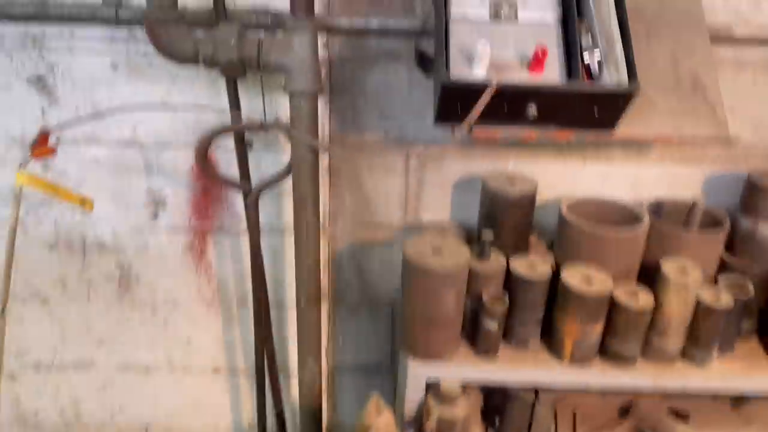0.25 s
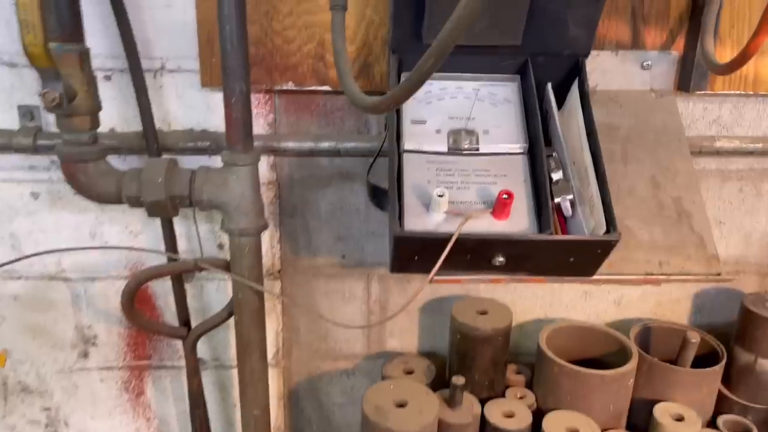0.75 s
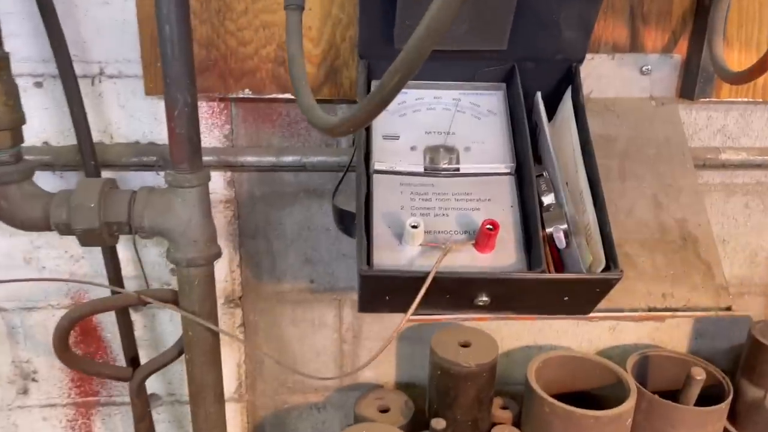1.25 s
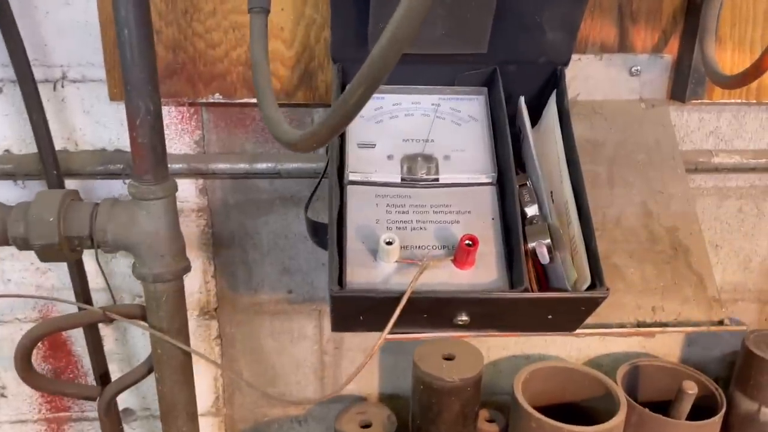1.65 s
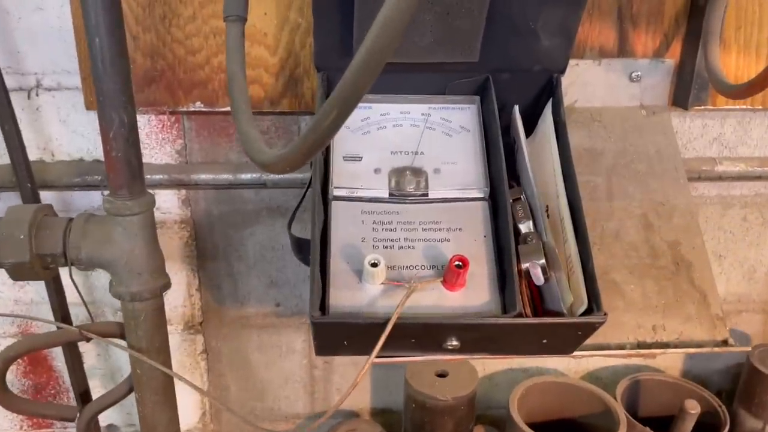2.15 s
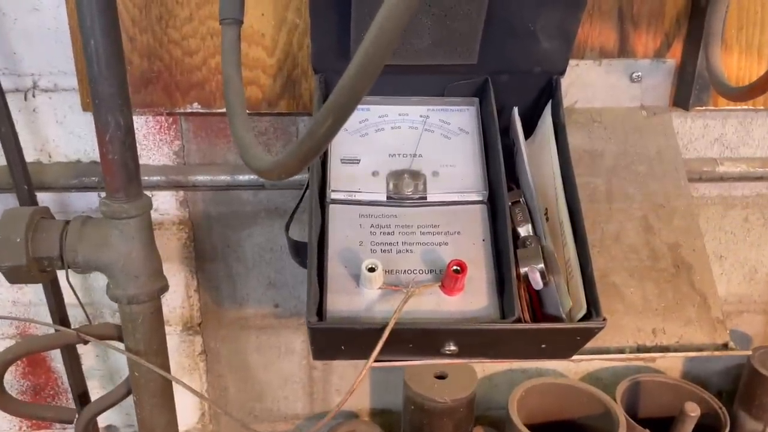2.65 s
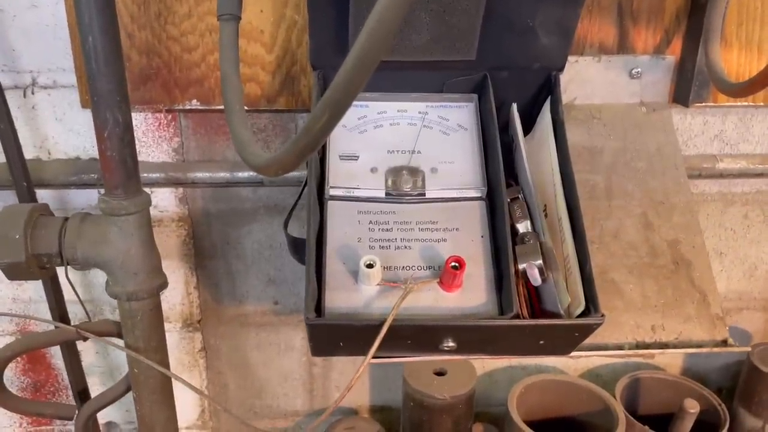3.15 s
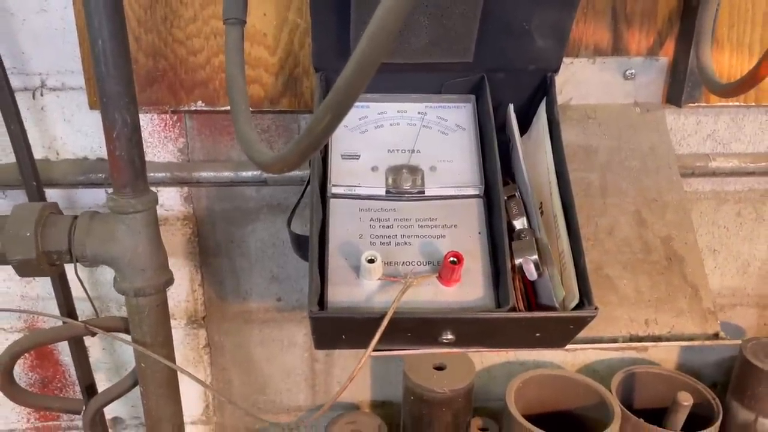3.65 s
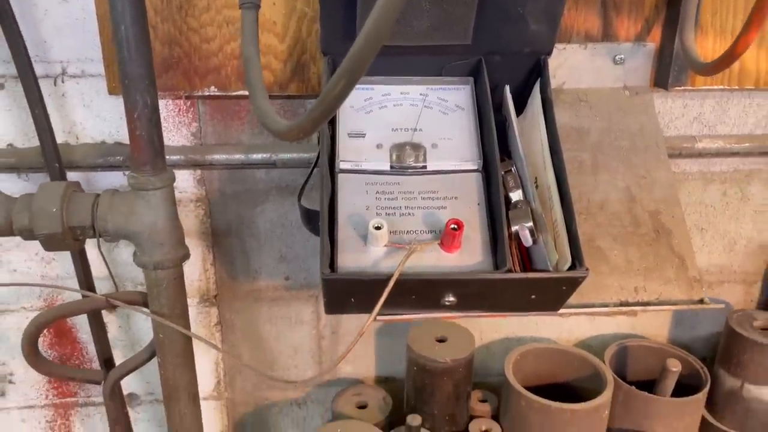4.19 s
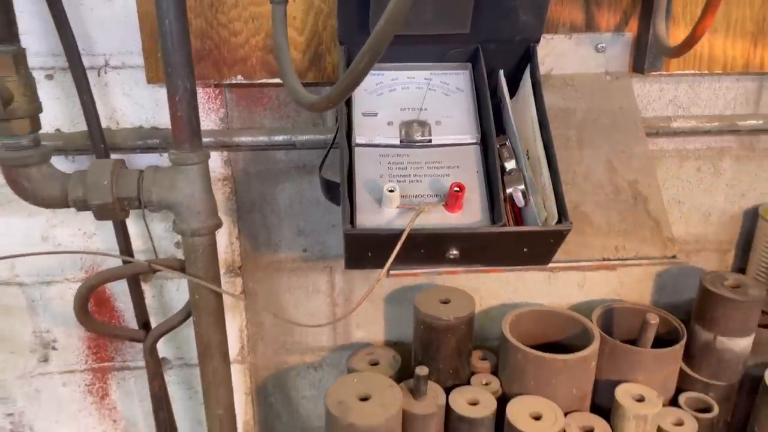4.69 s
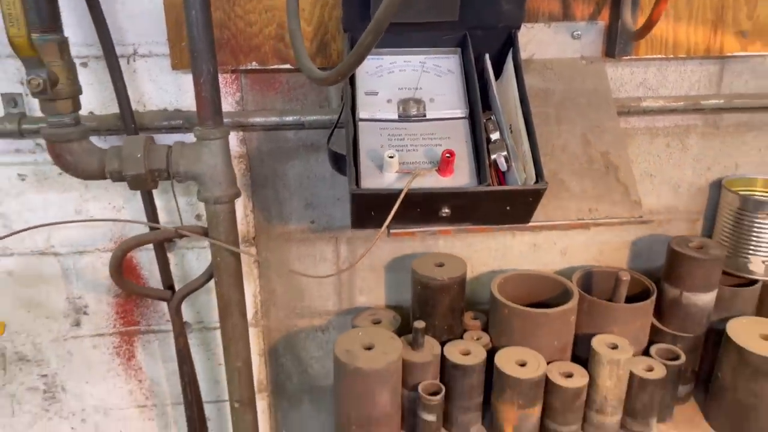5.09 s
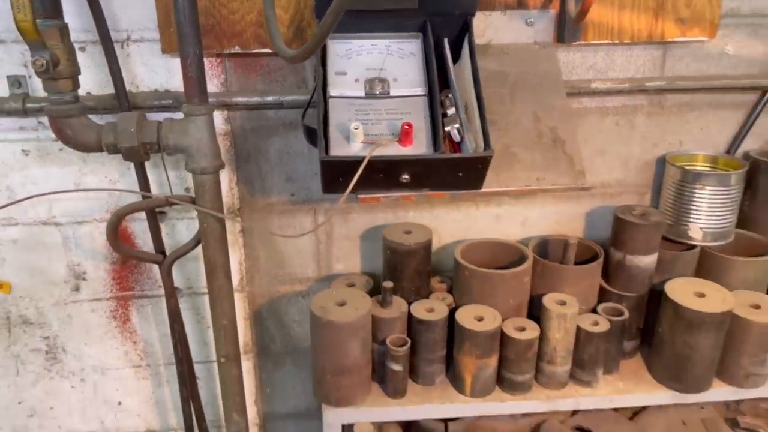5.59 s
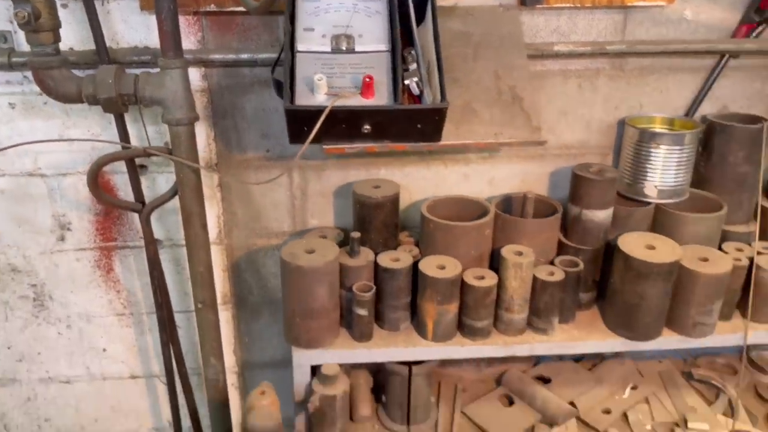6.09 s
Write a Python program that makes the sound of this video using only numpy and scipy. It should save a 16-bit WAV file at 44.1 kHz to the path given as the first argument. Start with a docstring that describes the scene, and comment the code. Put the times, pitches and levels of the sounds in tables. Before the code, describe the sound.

Steady burner roar fills a close workshop space, heard in stereo from a few steps away. Small gusts and soft thumps ripple through the flame, while the burner tube sings in short irregular swells. Gas and air hiss, and a blower motor hums with a faint whine toward the left. A quick cloth rub comes early; a tiny falling chirp appears around four seconds. The colour shifts subtly as the listener moves in and back.

```python
"""A gas-fired melting furnace runs steadily in a small workshop: shaped noise makes its rumble and roar.
The burner tube sings unsteadily (wavering sine plus narrow noise); gas and air hiss at the jet (noise).
The blower motor hums and whines (sines). The listener, a few steps away, leans in and back again,
which shifts echoes and low room peaks, with a brief rustle of clothing (noise strokes)."""
import sys
import numpy as np
from scipy import signal
from scipy.fft import rfft, irfft, next_fast_len
from scipy.io import wavfile

SR = 44100
rng = np.random.default_rng(int(sys.argv[2]) if len(sys.argv) > 2 else 0)


def master(y):
    """Save y as 16-bit WAV."""
    cut = np.clip(np.atleast_2d(y).T, -1, 1)
    pcm = np.round(cut * 32767)  # scale
    wavfile.write(sys.argv[1], SR, pcm.astype(np.int16))


N = 279229


def from_db(db):
    """Decibels to amplitude gain."""
    return 10 ** (np.asarray(db) / 20)


def rms_one(x):
    """Scale to rms 1."""
    return x / np.sqrt(np.mean(x ** 2) + 1e-20)


def in_time(rows):
    """Interpolate each column of a (time [s], ...) table at every sample."""
    time_s, *columns = np.transpose(rows)
    return [np.interp(np.arange(N) / SR, time_s, column) for column in columns]


def at_hz(points, hz):
    """Interpolate a (frequency [Hz], value) table on a log-frequency axis."""
    known_hz, values = np.transpose(points)
    return np.interp(np.log(hz + 1e-9), np.log(known_hz), values)


def pan(left_db):
    """Two channel gains for a left-minus-right level."""
    return from_db(np.array([[.5], [-.5]]) * left_db)


def drift(rate_hz):
    """Slow random signal of rms 1: white noise through two equal poles near rate_hz."""
    step = 40  # samples per slow sample
    pole = np.exp(-2 * np.pi * rate_hz * step / SR)
    white = rng.standard_normal(N // step + 2002)
    slow = signal.lfilter([1], [1, -2 * pole, pole * pole], white)[2000:]  # settled part
    return np.interp(np.arange(N) / step, np.arange(len(slow)), rms_one(slow))


def swell(start_s, hold_s, attack_s, release_s):
    """Envelope: exponential growth to 1, hold, exponential decay."""
    t = np.arange(N) / SR - start_s
    return np.exp(np.minimum(t, 0) / attack_s - np.maximum(t - hold_s, 0) / release_s)


def resonance(hz, centre_hz, width_hz):
    """Response of one damped mode, 1 at its top."""
    return 1j * hz * width_hz / (centre_hz ** 2 - hz ** 2 + 1j * hz * width_hz)


# chosen left-right correlation of the noise, opposed near 8 kHz: (frequency [Hz], correlation [-1..1])
EAR_CORRELATION = [(50, 0.99), (110, 0.97), (160, 0.91), (300, 0.92), (400, 0.78), (560, 0.89), (680, 0.46),
                   (900, 0.56), (1300, 0.59), (1950, 0.23), (3000, 0.53), (5800, 0.72), (6800, 0.29),
                   (8200, -0.85), (10800, 0.6)]
# stereo balance of the noise: (frequency [Hz], left minus right [dB])
EAR_BALANCE = [(60, 0.5), (200, 0.9), (330, -1.5), (600, -1.5), (800, 4), (1200, -2), (1500, 2), (2100, 2),
               (3200, 4), (5200, 3), (7500, 5.5), (12000, 1)]


def turbulence(gain_at):
    """Stereo noise of mid rms 1, shaped over frequency; ear correlation and balance vary by band."""
    size = next_fast_len(N, real=True)
    hz = np.fft.rfftfreq(size, 1 / SR)
    mid, side = rfft(rng.standard_normal((2, size)))
    correlation = np.clip(at_hz(EAR_CORRELATION, hz), -.995, .995)
    pair = np.sqrt(1 + correlation) * mid + np.sqrt(1 - correlation) * side * [[1], [-1]]
    shaped = pair * gain_at(hz) * pan(at_hz(EAR_BALANCE, hz))
    noise = irfft(shaped, size)[:, :N]
    return noise / np.std(noise.mean(axis=0))


def coloured(spectrum):
    """Turbulence with a tabulated spectrum."""
    return turbulence(lambda hz: from_db(at_hz(spectrum, hz)))


def narrow_noise(centre_hz, width_hz):
    """Narrow-band stereo noise of mid rms 1: sine and cosine carriers with random amplitudes."""
    phase = 2 * np.pi * np.cumsum(centre_hz * np.ones(N)) / SR
    mid, side = [drift(width_hz) * np.sin(phase) + drift(width_hz) * np.cos(phase) for part in range(2)]
    return mid + .5 * side * [[1], [-1]]


def tone(hz, waver_db, spread_rad):
    """Sine of rms 1 before its level wavers; the room shifts its phase in each ear."""
    phase = 2 * np.pi * np.cumsum(hz * np.ones(N)) / SR
    ears = np.array([np.sin(phase + spread_rad * drift(0.43)) for ear in range(2)])
    return np.sqrt(2) * ears * from_db(waver_db * drift(7.1))


def walls(x, away, echo_db=-20.0, travel_s=.0012, count=10):
    """Wall echoes comb the sound with fine ripples, which slide as the listener's head moves."""
    delays_s = rng.uniform(.008, .06, count)
    facings = rng.uniform(-1, 1, count)
    delays = [np.round((delay_s + facing * travel_s * away) * SR).astype(int)
              for delay_s, facing in zip(delays_s, facings)]
    echoes = sum(x[:, np.arange(N) - delay] for delay in delays)
    return x + from_db(echo_db) * echoes


# flame rumble and roar spectra: (frequency [Hz], relative level [dB])
RUMBLE_SPECTRUM = [(15, -38), (25, -27), (36, -8), (50, -2.5), (60, 0), (88, -2), (104, -1.5), (130, -5),
                   (160, -4), (190, -20), (400, -20), (2000, -82)]
ROAR_SPECTRUM = [(80, -26), (180, -7), (220, 0), (270, -1), (325, 2), (390, -2), (475, -1.5), (570, -2),
                 (690, -7), (910, -4.5), (1110, -10.5), (1500, -18.5), (2300, -21), (8000, -81)]
# flame rumble: (time [s], level [dB])
RUMBLE_LEVEL = [(0, -35.8), (1.0, -35), (2.0, -34.5), (2.7, -33), (3.4, -35.5), (4.1, -34), (5.3, -34),
                (6.33, -34)]
# chamber and flue resonances: (frequency [Hz], width [Hz], level before the roar's gain [dB])
CHAMBER_MODES = [(84.4, 4.6, -9), (321, 28, -12.5), (414.4, 7.3, -12.5), (1243, 93, -16), (1477, 22, -19.5)]


def flame(away, roar_db=-35, roar_loss_db=2, throb_db=0.2, flutter_db=0.59):
    """Turbulent burning: throbbing, puffing rumble and a fluttering, gusty roar that rings the chamber."""
    flutter = from_db(flutter_db * drift(15))
    throb = from_db(throb_db * drift(11))
    rumble_db, = in_time(RUMBLE_LEVEL)
    rumble = throb * from_db(rumble_db) * coloured(RUMBLE_SPECTRUM)
    burning = from_db(1.23) * walls(coloured(ROAR_SPECTRUM), away)
    chamber = sum(from_db(db) * turbulence(lambda hz: resonance(hz, centre_hz, width_hz))
                  for centre_hz, width_hz, db in CHAMBER_MODES)
    roar_gain = from_db(roar_db - roar_loss_db * away) * flutter
    roar = roar_gain * wall_dip(burning + chamber, away)
    return rumble + puffs() + gusts() + roar


# flame puffs: (time [s], frequency [Hz], envelope peak [dB])
PUFF_EVENTS = [(0.431, 62, -22), (0.651, 58, -21), (1.119, 99, -19), (1.46, 115, -22), (2.493, 112, -19),
               (2.811, 95, -19), (4.158, 68.4, -17), (4.211, 122, -21.5), (5.239, 70, -24)]


def puffs(rise_s=0.0051, fall_s=0.0073):
    """Pockets of gas burn all at once, each a dull thump in the chamber: a short sine burst."""
    t = np.arange(N) / SR
    return sum(from_db(db) * swell(start_s, 0, rise_s, fall_s) * np.sin(2 * np.pi * hz * (t - start_s))
               for start_s, hz, db in PUFF_EVENTS)


# gusts in the roar: (time [s], level before gust_db [dB])
GUST_EVENTS = [(.69, 5), (1.06, 2), (1.66, 2.5), (2.2, 1), (2.3, 0), (2.42, 0), (2.72, 4), (3.1, 1),
               (3.25, 0), (3.8, 3.5), (4.5, -5)]


def gusts(centre_hz=290, width_hz=155, gust_db=-36.5, swell_s=0.038):
    """Short swells of the flame: resonant noise under exponential rises and falls."""
    envelope = sum(from_db(db) * swell(start_s, 0, swell_s, swell_s) for start_s, db in GUST_EVENTS)
    noise = turbulence(lambda hz: resonance(hz, centre_hz, width_hz) ** 2)
    return from_db(gust_db) * envelope * noise


def wall_dip(x, away, dip_hz=288, width_hz=85, depth=0.5):
    """Further from the wall its reflection cancels part of a band of the low roar."""
    band = signal.lfilter(*signal.iirpeak(dip_hz, dip_hz / width_hz, fs=SR), x)
    return x - np.clip(depth * away ** 2, 0, 1) * band


# louder moments of the tube's unsteady, noisy note: (start [s], hold [s], level before trim_db [dB])
TUBE_LOUD_MOMENTS = [(0.15, 0.1, -35), (0.365, 0.03, -32), (0.49, .035, -34), (0.77, 0.035, -31),
                     (0.925, 0.14, -31), (1.225, 0.03, -29), (1.3, .035, -32), (1.385, .025, -32),
                     (1.51, 0.05, -29), (1.93, 0.07, -35), (2.05, .06, -31), (2.16, 0.02, -32),
                     (2.255, 0.08, -28.5), (2.54, 0.085, -32), (2.88, .035, -33), (3.052, 0.045, -28.5),
                     (3.32, 0.025, -31.5), (3.585, 0.1, -29.5), (3.91, 0.055, -34), (4.195, .02, -34),
                     (4.265, 0.02, -33.5), (4.38, 0.07, -35), (4.69, .035, -34.5), (5.13, 0.04, -36),
                     (5.24, .02, -34.5), (5.655, 0.02, -32.5), (5.72, .06, -37), (5.865, 0.08, -29.5),
                     (5.98, .04, -35.5), (6.112, 0.09, -30)]


def burner_tube(note_hz=532.5, wander_hz=3.21, air_db=-42, floor_db=-43.5, trim_db=-3.0, rasp_db=-9,
                attack_s=0.014, release_s=0.02):
    """The flow always rings the tube a little: an unsteady, noisy note with louder moments."""
    moments = [from_db(db + trim_db) * swell(start_s, hold_s, attack_s, release_s)
               for start_s, hold_s, db in TUBE_LOUD_MOMENTS]
    level = np.maximum(np.max(moments, axis=0), from_db(floor_db + 0.79 * drift(8.6)))
    rasp = from_db(rasp_db) * narrow_noise(note_hz, width_hz=28)
    sine = tone(note_hz + wander_hz * drift(9.1), waver_db=0.3, spread_rad=0.27)
    air = from_db(air_db) * turbulence(lambda hz: resonance(hz, note_hz, width_hz=18.7))
    return (level * (sine + rasp) + air) * pan(left_db=-0.5)


# jet hiss spectrum: (frequency [Hz], relative level [dB])
JET_SPECTRUM = [(300, -27), (900, 4), (1600, 4.5), (1950, 1.5), (2250, 2.5), (2700, -2), (3800, -2.5),
                (4800, -8), (5400, -8.5), (6700, -13.5), (7700, -23.5), (9500, -19), (12000, -26.5),
                (14000, -32)]
# jet hiss before wall echoes: (time [s], level [dB])
JET_LEVEL = [(0, -43), (.5, -42), (2.4, -42.5), (3.8, -42.5), (5.2, -43), (6.33, -43.5)]


def jet(away):
    """Gas and air hiss through the nozzle, coloured by the nearby walls."""
    hiss_db, = in_time(JET_LEVEL)
    return from_db(hiss_db) * walls(coloured(JET_SPECTRUM), away, echo_db=-17.0)


# motor hum, slot whine and its first lower sideband, before waver and pan: (time [s], level [dB])
HUM_LEVEL = [(0, -42), (.6, -40), (.8, -37.5), (1.25, -43.5), (1.46, -38), (1.6, -37), (2.04, -37.5),
             (2.18, -45), (2.5, -35), (2.65, -45), (2.82, -36.5), (3.1, -36), (3.24, -40), (3.36, -37),
             (3.68, -32), (3.83, -41), (5, -40.5), (6.33, -42.5)]
WHINE_LEVEL = [(0, -45.5), (.3, -56), (.6, -45), (2.6, -44), (4.2, -44.5), (4.65, -47), (5.1, -45),
               (6.33, -51.5)]
SIDEBAND_LEVEL = [(0, -50), (.55, -48.5), (1.0, -45.5), (2.4, -43), (3.7, -45), (4.3, -45), (4.75, -47),
                  (4.95, -49.5), (5.5, -50), (6.33, -61)]
# blower vibration before waver: (multiple of shaft speed [1], level [dB])
SHAFT_SHAKE = [(.485, -66), (1, -43.5), (9, -48.5)]
MAINS_HZ, ROTOR_SLOTS = 60, 20


def blower(away, slot_centre_hz=1177.5, slot_wander_hz=1.3, throb_hz=11.8, throb_depth=0.41,
           beat_db=-8, second_sideband_db=-8.0, hum_rough_db=2.0):
    """Motor hums at twice mains rate; that pull gives the rotor-slot whine two sidebands below it."""
    slot_hz = slot_centre_hz + slot_wander_hz * drift(1.63)
    (hum_db,), (whine_db,), (sideband_db,) = map(in_time, (HUM_LEVEL, WHINE_LEVEL, SIDEBAND_LEVEL))
    hum_hz = 2 * MAINS_HZ
    hum_gain = from_db(hum_db + hum_rough_db * drift(13))
    hum = hum_gain * tone(hum_hz, waver_db=0.5, spread_rad=0.25) * pan(left_db=-2.0)
    throb = 1 + throb_depth * np.sin(2 * np.pi * throb_hz * np.arange(N) / SR)
    whine = from_db(whine_db) * throb * tone(slot_hz, waver_db=1.0, spread_rad=0.097) * pan(left_db=6.5)
    first_hz = slot_hz - hum_hz
    beat = from_db(beat_db) * tone(first_hz + throb_hz, waver_db=0.0, spread_rad=0.19)
    first = tone(first_hz, waver_db=2.0, spread_rad=0.64) + beat
    second = from_db(second_sideband_db) * tone(slot_hz - 2 * hum_hz, waver_db=2.5, spread_rad=0.24)
    sidebands = from_db(sideband_db) * (first * pan(left_db=-2.0) + second)
    shaft_hz = slot_hz / ROTOR_SLOTS
    shake = sum(from_db(db) * tone(multiple * shaft_hz, waver_db=2.0, spread_rad=0.088)
                for multiple, db in SHAFT_SHAKE)
    return hum + whine + sidebands + shake


# cloth strokes: (start [s], hold [s], rise [s], fall [s], level before grain [dB], tilt [dB/octave])
CLOTH_STROKES = [(0.997, 0.024, 0.027, .035, -46.5, -0.5), (1.36, 0.01, .003, 0.022, -46.5, 2),
                 (1.452, 0.06, 0.052, 0.03, -52, 4.5), (1.524, 0.042, 0.028, 0.055, -40, -1),
                 (1.605, .05, .025, .03, -49.5, 1.5)]
# cloth spectrum before tilt: (frequency [Hz], relative level [dB])
CLOTH_SPECTRUM = [(500, -23), (1500, 1), (3000, 4), (5500, -2.5), (7500, -10), (11000, -9), (14000, -18)]


def clothing(grain_db=1.0, pivot_hz=4000):
    """Cloth slides close by in short, slightly grainy noise strokes, each with its own brightness."""
    sliding = 0
    for start_s, hold_s, rise_s, fall_s, db, tilt_db in CLOTH_STROKES:
        noise = turbulence(lambda hz: from_db(at_hz(CLOTH_SPECTRUM, hz)
                                              + tilt_db * np.log2((hz + 1) / pivot_hz)))
        sliding = sliding + from_db(db) * swell(start_s, hold_s, rise_s, fall_s) * noise
    return sliding * from_db(grain_db * drift(90))


# bands that swell briefly: (start [s], hold [s], frequency [Hz], width [Hz], level [dB])
SWELLING_BANDS = [(1.15, 0.092, 2320, 80, -49), (3.306, 0.35, 2640, 100, -56),
                  (5.523, 0.16, 3980, 150, -55), (5.952, 0.085, 4400, 100, -56),
                  (6.106, 0.025, 687, 120, -50)]


def band_swells(fade_s=0.029):
    """Narrow bands of the roar and hiss swell briefly, and the last, near 690 Hz, marks the burner tube's
    abrupt surge: narrow noise under short envelopes."""
    return sum(from_db(db) * swell(start_s, hold_s, fade_s, fade_s) * narrow_noise(centre_hz, width_hz)
               for start_s, hold_s, centre_hz, width_hz, db in SWELLING_BANDS)


# one faint chirp: (start [s], hold [s], frequency at start before blur [Hz], level before waver [dB])
CHIRP = (4.04, 0.045, 886, -38)


def short_note(attack_s=.04, release_s=0.012, sag_hz_per_s=150, blur_hz=10):
    """One short, unsteady chirp slides down out of the roar and is gone."""
    start_s, hold_s, hz, db = CHIRP
    since_s = np.clip(np.arange(N) / SR - start_s, -1, 1)
    chirp_hz = hz - sag_hz_per_s * since_s + blur_hz * drift(31)
    envelope = from_db(db) * swell(start_s, hold_s, attack_s, release_s)
    return envelope * tone(chirp_hz, waver_db=4.5, spread_rad=0.44)


# faint narrow peak in the hiss, climbing: (time [s], frequency [Hz], level before pan [dB])
CLIMBING_PEAK = [(0, 1995, -52), (.6, 2015, -52.5), (1.1, 2310, -63), (1.9, 2377, -56), (2.4, 2494, -55),
                 (3.2, 2615, -55), (3.9, 2635, -61), (5, 2806, -59), (6.33, 2980, -60)]


def hiss_peak():
    """A faint narrow peak in the hiss climbs slowly throughout: narrow noise on a moving centre."""
    peak_hz, peak_db = in_time(CLIMBING_PEAK)
    return from_db(peak_db) * narrow_noise(peak_hz, width_hz=98) * pan(left_db=6.0)


# low room peaks: (frequency near [Hz], shift when far [Hz], width [Hz], level when far [dB])
LOW_ROOM_PEAKS = [(281.3, -78, 14.5, -42.5), (411, 271.5, 41, -43)]


def room_peaks(away):
    """Low room peaks swell and slide when the listener is far: narrow noise scaled by distance."""
    peaks = sum(from_db(db) * narrow_noise(near_hz + shift_hz * away, width_hz)
                for near_hz, shift_hz, width_hz, db in LOW_ROOM_PEAKS)
    return away ** 2 * peaks


# listener leans in and back: (time [s], nearness [0..1])
LISTENER_LEAN = [(0, 0.1), (.3, 0.42), (.7, 0.71), (2.3, 1), (3.7, 0.83), (4.8, 0.59), (5.5, 0.22),
                 (6.33, 0.01)]


def scene():
    """Sum of furnace, blower, listener and room."""
    nearness, = in_time(LISTENER_LEAN)
    away = 1 - nearness
    furnace = flame(away) + burner_tube() + jet(away) + blower(away)
    return furnace + clothing() + band_swells() + short_note() + hiss_peak() + room_peaks(away)


def record(dry, cutoff_hz=13600):
    """Steep elliptic low-pass: 0.1 dB ripple, 80 dB stopband."""
    return signal.sosfilt(signal.ellip(10, .1, 80, cutoff_hz, fs=SR, output="sos"), dry)


dry = scene()
out = record(dry)
master(out)
```